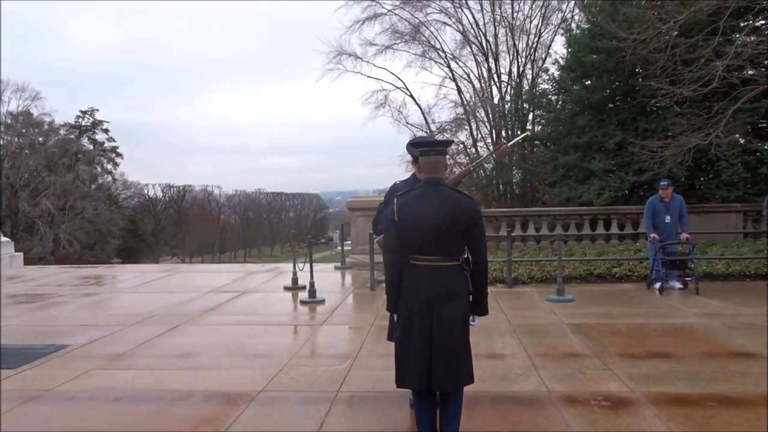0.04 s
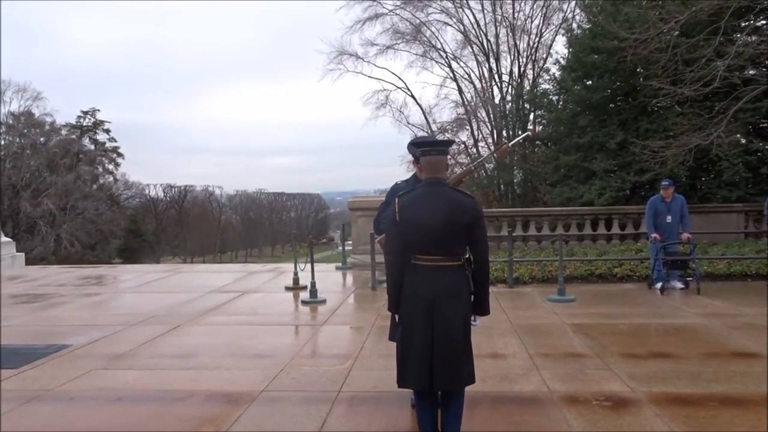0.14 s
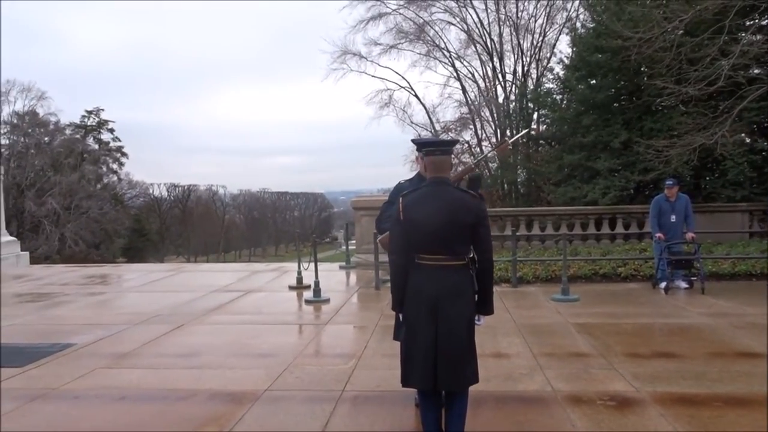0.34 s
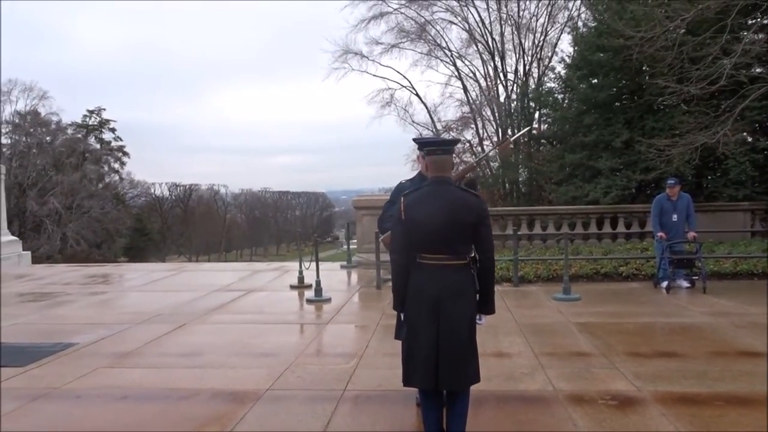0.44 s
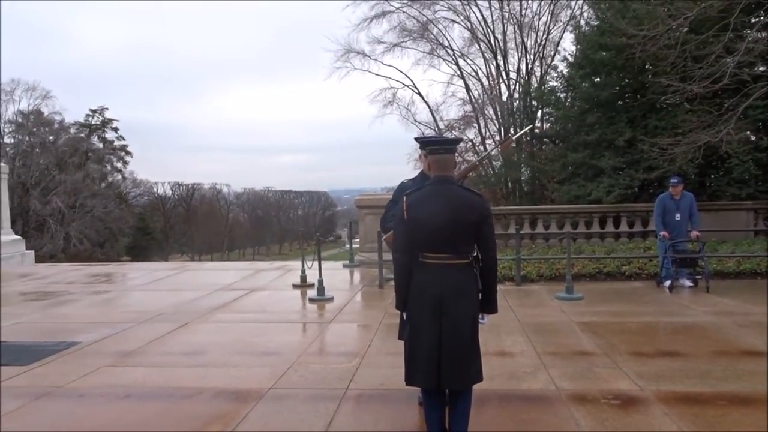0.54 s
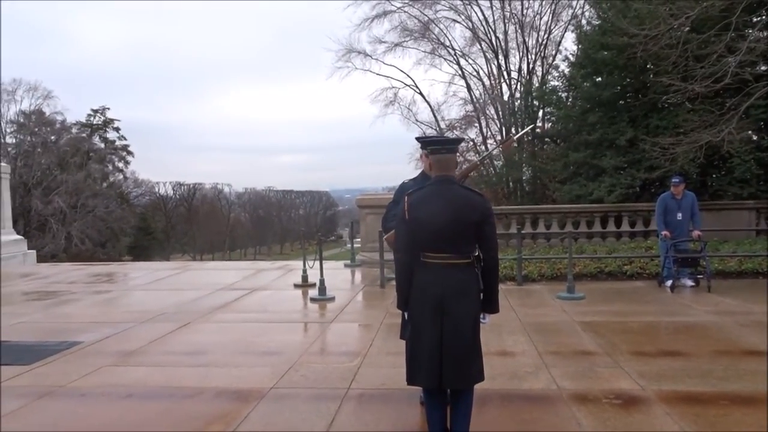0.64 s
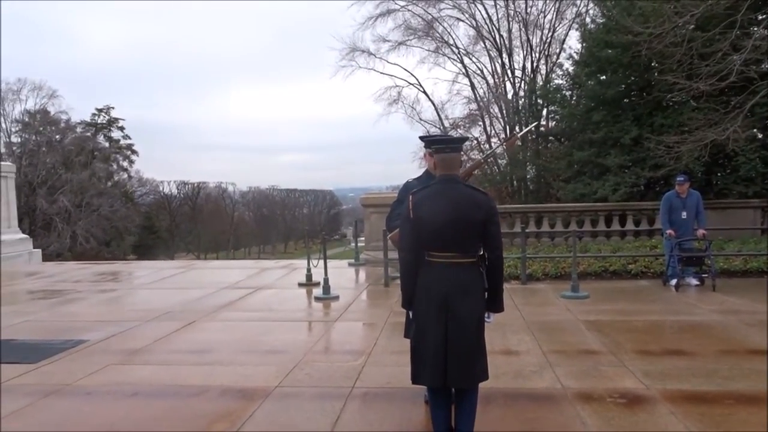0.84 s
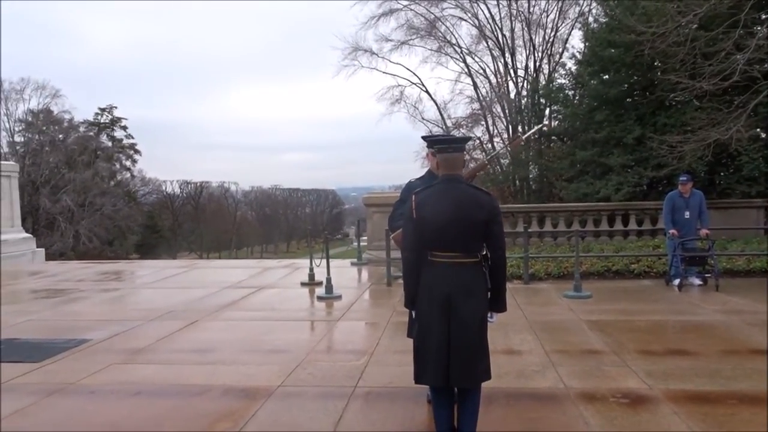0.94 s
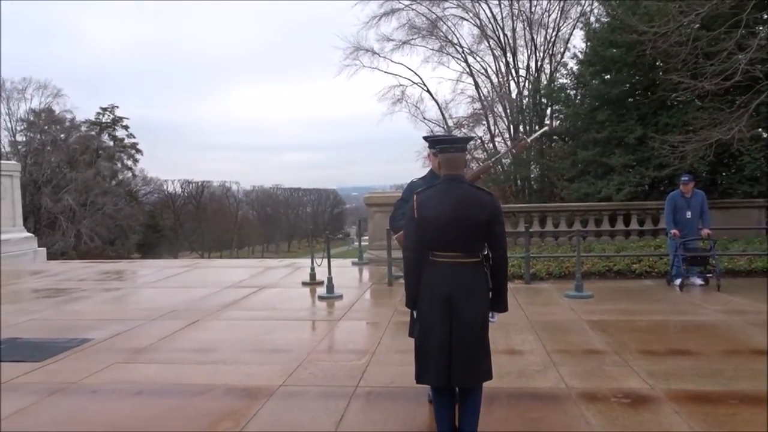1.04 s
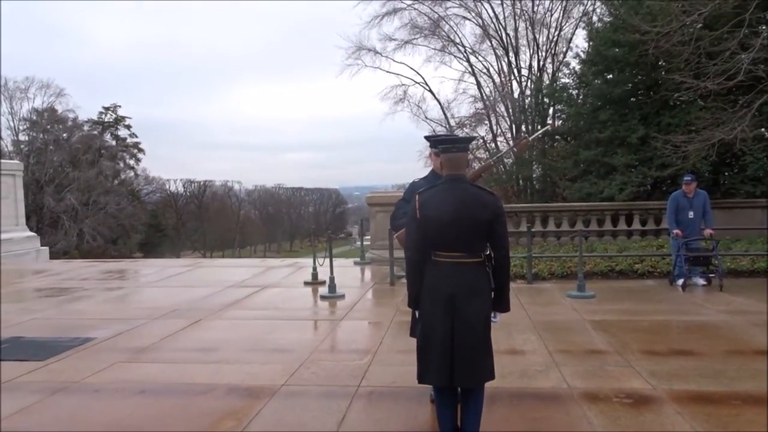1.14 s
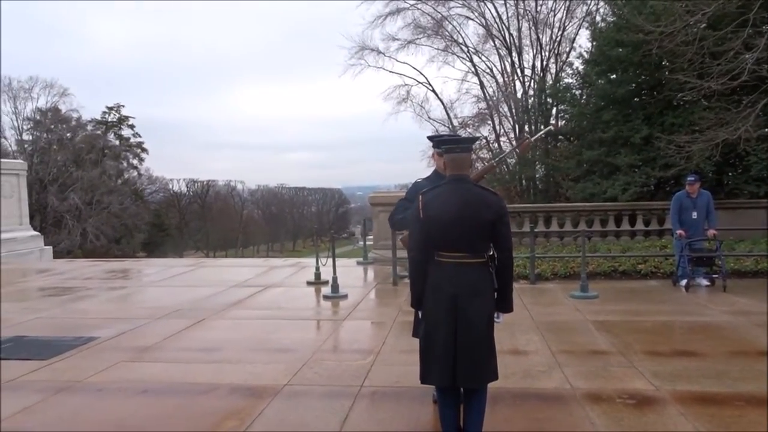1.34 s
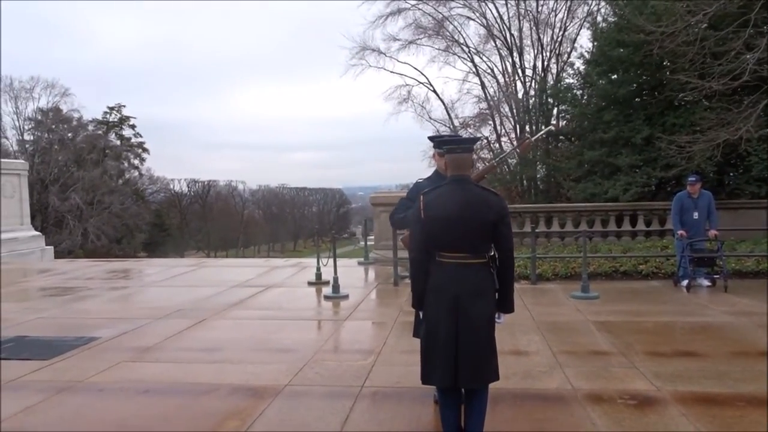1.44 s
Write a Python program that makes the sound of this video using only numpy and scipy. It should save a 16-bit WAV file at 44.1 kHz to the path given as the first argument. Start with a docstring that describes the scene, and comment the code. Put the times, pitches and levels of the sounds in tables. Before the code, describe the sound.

A rifle is handled outdoors: its steel action clacks in one quick, loud cluster, then a palm slaps the wooden stock and loose fittings rattle. Both hits echo off stone over faint distant traffic and wind.

```python
"""On a wet stone plaza a guard handles a rifle. The steel action clacks in a quick cluster, then a
palm slaps the wooden stock and the fittings rattle. Each impact gives a broadband crack and excites
the damped modes of the struck body. Stone walls reflect every blow over a distant rumble of traffic
and wind. The camera limits the peaks, and its right channel is much duller."""
import sys
import numpy as np
from scipy import signal
from scipy.fft import rfft, irfft
from scipy.io import wavfile
from scipy.ndimage import uniform_filter1d

SR = 44100
rng = np.random.default_rng(int(sys.argv[2]) if len(sys.argv) > 2 else 0)


def store_wav(level_fs):
    """Save 16-bit WAV to argv[1]."""
    pcm = np.round(np.clip(np.atleast_2d(level_fs), -1, 1) * 32767)
    wavfile.write(sys.argv[1], SR, pcm.T.astype(np.int16))


N = 66150

# steel impacts; the first precedes time zero and is heard by its reverberation
# (time [s], crack level [dB], ring level [dB], attack [s], crack t60 [s])
STEEL_IMPACTS = [(-.085, -16, -15.5, 0.003, 0.073), (0.2164, -12, -27, 0.0052, 0.063),
                 (0.2225, -13, -26.5, 0.00048, 0.043), (.240, -15.5, -21, 0.00083, 0.049),
                 (.2518, -7, 3.5, 0.00035, 0.048), (0.2617, -2, 0, 0.00094, 0.037),
                 (.2685, -1, -4, 0.00025, 0.06), (0.2733, -4, -7.5, 0.00077, 0.047),
                 (0.2878, -16, -11, 0.0016, 0.083)]
# modes of the rifle under a steel blow (frequency [Hz], level [dB], t60 [s])
STEEL_MODES = [(630, -19, 0.1), (993, -19, 0.075), (1233, -2, 0.079), (1540, -14, 0.11), (4090, -16, 0.063),
               (4402, 1, 0.09), (4475, -20, 0.097), (4850, -9.5, .09), (5110, -32, 0.12),
               (6590, -12.5, 0.18), (9700, -16.5, 0.14), (10690, -13, 0.26), (12060, -19, 0.11),
               (13000, -18, 0.11)]
# spectrum of a steel crack (frequency [Hz], level [dB])
CRACK_SPECTRUM = [(150, -39), (450, -22), (700, -2), (1250, 4.5), (2000, -1), (3200, -4), (4400, 7),
                  (5700, -2.5), (7200, -1.5), (8600, -9.5), (10800, -9.5), (13500, -14), (16000, -14.5)]
# spectrum of the light tick before the cluster (frequency [Hz], level [dB])
TICK_SPECTRUM = [(500, -25), (3500, -7), (4700, 0.5), (7800, -2.5), (9500, -7.5), (16000, -16)]
# hand on the stock; a light grip has no bass (time [s], level [dB], low cut [Hz])
PALM_IMPACTS = [(.2432, -13, 786), (1.0482, 0, 170), (1.0588, -7.5, 454), (1.067, -9, 704)]
# modes of the stock (frequency [Hz], level [dB], t60 [s])
WOOD_MODES = [(313.5, -3.5, 0.13), (620, -3.5, 0.099), (709, -2.5, 0.094), (827, 2.5, 0.097),
              (1128, -4, 0.065), (1226, -1, 0.12), (1644, -1.5, 0.086), (2270, -7.5, 0.079)]
# spectrum of a palm's smack (frequency [Hz], level [dB])
SMACK_SPECTRUM = [(60, -34), (180, -14), (450, -1), (900, -3), (1600, -2.5), (2400, -6.5), (3400, -11),
                  (4400, -6), (6500, -16.5), (10000, -22), (16000, -42)]
# contacts of the loose fittings (time [s], level [dB])
FITTING_IMPACTS = [(1.048, -4.5), (1.0634, 2), (1.0728, 2.5), (1.079, 2.5), (1.094, -1), (1.1054, 0),
                   (1.116, -4.5), (1.122, -5), (1.131, -0.5)]
# modes of a fitting (frequency [Hz], level [dB], t60 [s])
FITTING_MODES = [(4860, 2, 0.084), (4950, -4, 0.059), (6370, -6, 0.07), (7510, -7.5, 0.12),
                 (11120, -6, 0.053)]
# spectrum of a fitting's scrape (frequency [Hz], level [dB])
SCRAPE_SPECTRUM = [(300, -8.5), (900, 8), (1500, 1), (3300, -6), (5000, 6), (5900, -3.5), (7500, -3),
                   (9300, -7.5), (11800, -5.5), (13500, -10), (16000, -22)]
# reverberation time, floored at 1 ms after interpolation (frequency [Hz], t60 [s])
REVERB_TIMES = [(200, -0.6), (1000, 0.73), (2500, 0.9), (4500, 0.6943), (8000, 0.65), (15000, 0.45)]
# spectral weighting of the echoes and tail (frequency [Hz], gain [dB])
REVERB_SPECTRUM = [(100, -30), (400, -5.5), (1200, -5), (2500, 0.5), (5000, -1), (10000, 3), (16000, 5)]
# scattered reflections from the stonework (delay [s], level [dB], t60 [s])
WALL_ECHOES = [(.006, -16.5, 0.066), (0.082, -16, 0.042), (.102, -13, 0.15)]
# spectral density of traffic and wind (frequency [Hz], level [dB])
TOWN_SPECTRUM = [(15, -25), (35, -8), (70, -3), (150, -4), (230, -6.5), (430, -14.5), (860, -8.5),
                 (1900, -25), (4000, -32.5), (6500, -38.5), (15000, -52)]
# background level as the camera's automatic gain ducks and recovers (time [s], level [dB])
BACKGROUND_GAIN = [(0, 1.5), (.2, 0.5), (.4, -1.5), (.8, -1.5), (1.1, 0), (1.5, -2)]
# right channel relative to the left (frequency [Hz], gain [dB])
RIGHT_GAIN = [(25, -0.7), (125, -0.45), (320, -.6), (700, -3.5), (1290, -4.5), (2380, -8.5), (4400, -12.5),
              (8120, -19), (11000, -22.5), (15000, -32)]
# right channel relative to the left (frequency [Hz], phase lead [rad])
RIGHT_LEAD = [(20, .15), (60, 0.23), (130, 0.74), (290, 1.08), (640, 1.91), (1400, 1.86), (4000, 1.7),
              (12000, 1.6)]

LEAD_S, ATTACK_S = 0.3, 0.00027
CRACK_DB, STEEL_DB = -5, -11
TICK_S, TICK_DB = 0.1286, -31.5
SMACK_DB, WOOD_DB = -8.5, -12
SCRAPE_DB, CHINK_DB = -15, -27
SPLIT_HZ, SPLIT_SHARE = 9.1, 0.00486  # spread of a mode's partials: constant and proportional parts
ACTION_WET_DB, STOCK_WET_DB, FITTINGS_WET_DB, RING_WET_DB = 1.5, -1, -9.5, -3.5  # sends to the plaza
TAIL_DB, WIDTH_DB = -7.5, -8.5
TOWN_DB, PATCH_DB = -38, 1.5
LIMIT_DB, RECOVER_DB_PER_S, SQUEEZE = -11, 4, 0.53  # SQUEEZE: share of the excess level removed
HISS_DB, EDGE_HZ = -69, 15800


def action():
    """Impact excitation: steel parts collide and set the rifle ringing. Returns cracks and rings."""
    cracks, rings = silence(), silence()
    add(cracks, TICK_S, amp(TICK_DB) * contact(TICK_SPECTRUM, ATTACK_S, t60=0.019))
    for s, crack_db, ring_db, attack, t60 in STEEL_IMPACTS:
        add(cracks, s, amp(CRACK_DB + crack_db) * contact(CRACK_SPECTRUM, attack, t60))
        add(rings, s, amp(STEEL_DB + ring_db) * ring(STEEL_MODES))
    return np.array([cracks, rings])


def stock():
    """Damped resonance: wood struck by a palm knocks briefly. Returns smacks and knocks."""
    smacks, knocks = silence(), silence()
    for s, db, low_hz in PALM_IMPACTS:
        low_cut = signal.butter(N=2, Wn=low_hz, btype="high", fs=SR)
        smack = contact(SMACK_SPECTRUM, ATTACK_S, t60=0.064)
        add(smacks, s, amp(SMACK_DB + db) * signal.lfilter(*low_cut, smack))
        add(knocks, s, amp(WOOD_DB + db) * signal.lfilter(*low_cut, ring(WOOD_MODES)))
    return np.array([smacks, knocks])


def fittings():
    """Intermittent contact: small loose metal parts rattle. Returns scrapes and chinks."""
    scrapes, chinks = silence(), silence()
    for s, db in FITTING_IMPACTS:
        add(scrapes, s, amp(SCRAPE_DB + db) * contact(SCRAPE_SPECTRUM, attack=0.0031, t60=0.046))
        add(chinks, s, amp(CHINK_DB + db) * ring(FITTING_MODES))
    return np.array([scrapes, chinks])


def contact(spectrum, attack, t60):
    """Modal overlap: dense, short-lived modes merge into one crack with a smooth spectrum."""
    t = np.arange(4096) / SR
    hz = np.fft.rfftfreq(len(t), 1 / SR)
    envelope = np.minimum(t / attack, 1) * decay(t, t60)
    phases = np.angle(rfft(envelope * rng.standard_normal(len(t))))
    cloud = irfft(amp(read(spectrum, hz)) * np.exp(1j * phases))
    taper = np.clip(2 - 2 * t / t60, 0, 1) * (t < t[-1] / 2)
    return unit(cloud * taper) * np.sqrt(np.mean(envelope ** 2))


def ring(modes, count=3):
    """Free vibration: each mode is a cluster of close partials that beat differently at every blow."""
    t = np.arange(SR // 2) / SR
    out = np.zeros(len(t))
    for hz, db, t60 in modes:
        offsets = np.linspace(-1, 1, count) + rng.uniform(-0.64, 0.39, count)
        partials = hz + (SPLIT_HZ + SPLIT_SHARE * hz) * offsets
        envelope = decay(t, t60) * np.minimum(t / ATTACK_S, 1)
        tone = envelope * np.sin(2 * np.pi * (partials[:, None] * t + rng.random())).sum(0)
        out += amp(db) * unit(tone) * np.sqrt(np.mean(envelope ** 2) / 2)
    return out


def plaza(x):
    """Reverberation: convolution with scattered wall echoes and a diffuse tail, new at each call."""
    t = np.arange(SR) / SR
    hz, frame_s, bins = signal.stft(rng.standard_normal(SR), SR, nperseg=256)
    damped = bins * decay(frame_s, read(REVERB_TIMES, hz)[:, None])
    tail = signal.istft(damped, SR, nperseg=256)[1][:SR]
    response = amp(TAIL_DB) * unit(tail * np.minimum(t / 0.013, 1))  # builds up over 13 ms
    for delay, db, t60 in WALL_ECHOES:
        echo = rng.standard_normal(SR) * (t > delay) * decay(abs(t - delay), t60)
        response += amp(db) * unit(echo)
    colour = amp(read(REVERB_SPECTRUM, np.fft.rfftfreq(2 * SR, 1 / SR)))
    response = irfft(rfft(response, 2 * SR) * colour)[:SR]
    return signal.fftconvolve(x, response / np.sqrt(SR))[:len(x)]


def town():
    """Modulated noise: far traffic and wind drift in level over patches of time and frequency."""
    bins = signal.stft(noise(TOWN_SPECTRUM, N), nperseg=1024, noverlap=768)[2]
    bands = uniform_filter1d(rng.standard_normal(bins.shape), size=6, axis=0)
    patches = unit(uniform_filter1d(bands, size=14, axis=1))
    rumble = signal.istft(bins * amp(PATCH_DB * patches), nperseg=1024, noverlap=768)[1][:N]
    gain_db = np.interp(np.arange(N) / SR, *np.transpose(BACKGROUND_GAIN))
    return amp(TOWN_DB + gain_db) * unit(rumble)


def noise(spectrum, size):
    """Fourier synthesis: random phases turn a spectrum into noise of unit rms."""
    hz = np.fft.rfftfreq(size, 1 / SR)
    phasors = np.exp(2j * np.pi * rng.random(len(hz)))
    return unit(irfft(amp(read(spectrum, hz)) * phasors, size))


def decay(t, t60):
    """Exponential damping: a fall of 60 dB in t60 seconds."""
    return np.exp(-np.log(1000) * t / np.maximum(t60, 1e-3))


def amp(db):
    """The decibel law: level to amplitude ratio."""
    return 10 ** (np.asarray(db) / 20)


def unit(x):
    """Normalisation to an rms of one."""
    return x / np.sqrt(np.mean(x ** 2) + 1e-20)


def read(points, hz):
    """Interpolation of a table along a log-frequency axis."""
    f, value = np.transpose(points)
    return np.interp(np.log(hz + 1), np.log(f + 1), value)


def silence():
    """Zero sound pressure, starting LEAD_S before time zero."""
    return np.zeros(N + round(LEAD_S * SR))


def add(mix, s, sound):
    """Superposition: a sound joins the mix at time s."""
    part = mix[max(round((s + LEAD_S) * SR), 0):][:len(sound)]
    part += sound[:len(part)]


def scene():
    """Direct and reverberant fields sum at a microphone pair with a dull, phase-shifted right side."""
    steel, wood, loose = action(), stock(), fittings()
    direct = (steel + wood + loose).sum(0)
    cracks, rings = amp(ACTION_WET_DB) * steel + amp(STOCK_WET_DB) * wood + amp(FITTINGS_WET_DB) * loose
    sent = cracks + amp(RING_WET_DB) * rings  # cracks carry further than rings
    background = town()
    left = (direct + plaza(sent))[-N:] + background
    right = left + amp(WIDTH_DB) * plaza(sent)[-N:]  # independent reverberation adds width
    hz = np.fft.rfftfreq(2 * N, 1 / SR)
    transfer = amp(read(RIGHT_GAIN, hz)) * np.exp(1j * read(RIGHT_LEAD, hz))
    right = irfft(rfft(right, 2 * N) * transfer)[:N]
    return np.array([left, right])


def record(dry):
    """Compression: the left level drives a slowly recovering limiter; hiss, clipping, low-pass follow."""
    power_db = 10 * np.log10(abs(uniform_filter1d(dry[0] ** 2, size=200)) + 1e-12)
    recovery_db = np.arange(N) * RECOVER_DB_PER_S / SR
    held_db = np.maximum.accumulate(power_db + recovery_db) - recovery_db
    excess_db = np.maximum(held_db - LIMIT_DB, 0)
    limited = dry * amp(-SQUEEZE * uniform_filter1d(excess_db, size=100))
    hiss = amp(HISS_DB) * rng.standard_normal((2, N))
    low_pass = signal.firwin(511, EDGE_HZ, window=("kaiser", 9), fs=SR)
    return signal.oaconvolve(np.clip(limited + hiss, -1, 1), low_pass[None], "same")


dry = scene()
out = record(dry)
store_wav(out)
```